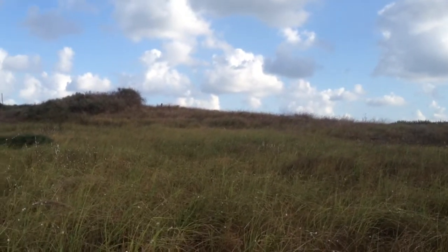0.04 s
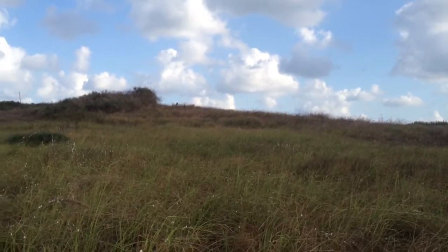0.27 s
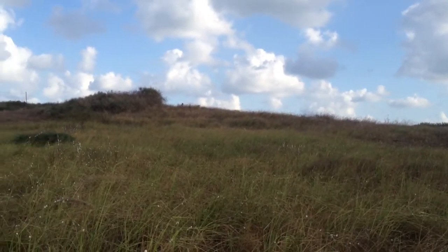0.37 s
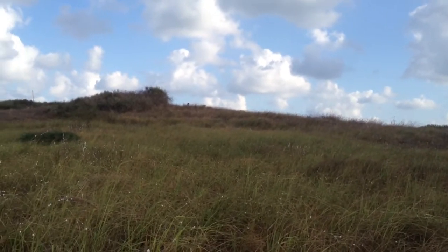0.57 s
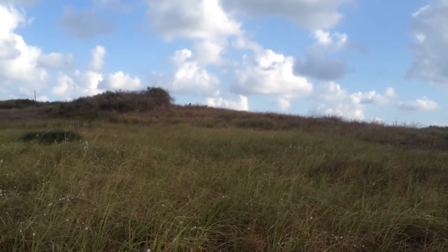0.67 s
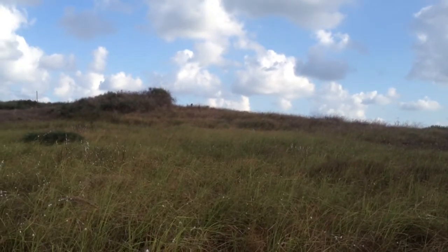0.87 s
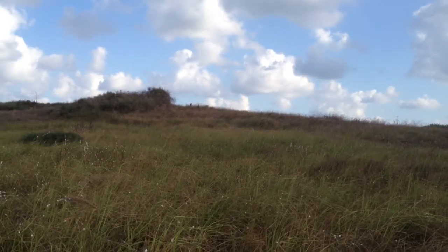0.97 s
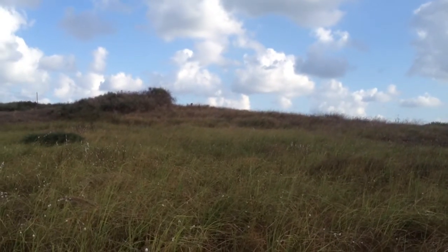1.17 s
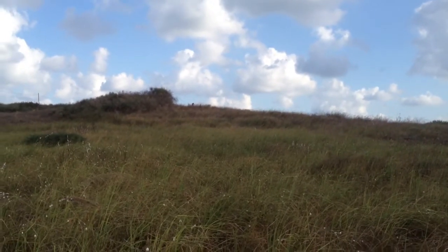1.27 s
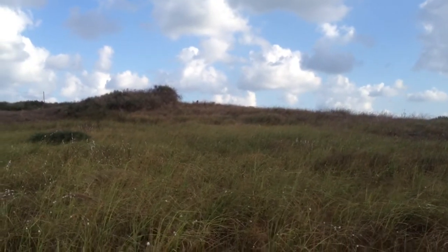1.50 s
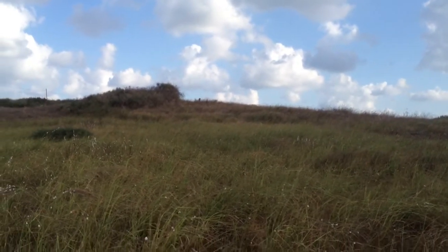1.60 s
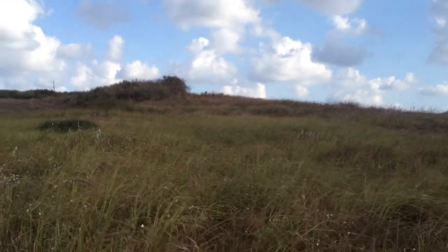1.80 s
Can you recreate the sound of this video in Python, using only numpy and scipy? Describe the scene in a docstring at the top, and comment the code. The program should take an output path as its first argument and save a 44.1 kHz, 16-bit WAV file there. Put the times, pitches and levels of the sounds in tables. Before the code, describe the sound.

A single jackal wail, heard from some distance in an open field, begins raspy, glides downward and thins to a quiet whine. Light wind continues throughout, and a soft, faint bump follows the call.

```python
"""A jackal wails on open grassland

A jackal calls once: a soft hum, a hoarse catch, a full cry that sinks in pitch, then a thin whine.
Its voice is a stack of overtones (multiples of one pitch), and air in its throat adds a rasp.
The land returns a faint echo. Light wind, hiss, a distant drone, grass rustles and a bump lie under it."""
import sys
import numpy as np
from scipy import signal
from scipy.fft import rfft, irfft, next_fast_len
from scipy.io import wavfile
from scipy.ndimage import map_coordinates

SR = 44100
rng = np.random.default_rng(int(sys.argv[2]) if len(sys.argv) > 2 else 0)


def persist_wave(psi):
    """Save psi, clipped to +-1, as 16-bit WAV."""
    counts = np.round(np.clip(psi, -1, 1) * 32767).astype(np.int16)
    wavfile.write(sys.argv[1], SR, np.atleast_2d(counts).T)


N = 81585

# Strength of the wind. Each row: time in seconds, level in dB.
WIND_LEVEL = [(0, -56), (.08, -55.5), (.2, -53.5), (.35, -57), (.7, -56), (1.1, -57.5), (1.3, -58),
              (1.5, -56), (1.85, -57)]
# Tone of the wind. Each row: frequency in Hz, relative level in dB.
WIND_COLOUR = [(15, -70), (25, -31.5), (134, -11), (162, -6), (223, -5.5), (258, -3.5), (287, -9.5),
               (355, -1.5), (379, -9), (716, -5.5), (780, -5), (1030, -13), (1140, -11.5), (1750, -22.5),
               (4000, -41), (5200, -56.5), (8800, -120)]
# Tone of the hiss. Each row: frequency in Hz, relative level in dB.
HISS_COLOUR = [(1500, -13.5), (3500, 3), (6000, 0), (9500, -7.5), (12000, -4), (15000, 2)]
# The distant drone. Each row: frequency in Hz, level in dB.
DRONE_TONES = [(135, -68), (187, -70.5), (252, -75)]
# Pitch of the voice. Each row: time in seconds, pitch in Hz.
VOICE_PITCH = [(.2, 343.4), (.24, 344.3), (.262, 350.2), (.3, 347.9), (.36, 354.4), (.42, 355.2),
               (.48, 351.7), (.54, 345.4), (.6, 335), (.72, 316.5), (.8, 300), (.9, 276), (.96, 258.3),
               (1.07, 237.6), (1.2, 225.3), (1.29, 209.2), (1.38, 187.3), (1.49, 164)]
# Unsteadiness of the voice. Each row: time in seconds, typical shake as a share of the pitch.
PITCH_SHAKE = [(.2, 0.034), (.24, 0.03), (.255, 0.011), (.33, 0.015), (.4, 0.0059), (.8, .003), (1.4, .005)]
# The hum before the mouth opens. Each row: time in seconds, level in dB.
HUM_LEVEL = [(0, -79.5), (.08, -64), (.18, -61), (.25, -78)]
# Grass rustles. Each row: middle in seconds, length in seconds, level in dB.
GRASS_RUSTLES = [(0.05, 0.082, -74.5), (1.455, 0.091, -76.5), (1.75, 0.021, -77)]
# Tone of the grass. Each row: frequency in Hz, relative level in dB.
GRASS_COLOUR = [(800, -34), (2200, 6), (3500, 7), (6000, -15), (10000, -19)]
# Hoarse air in the throat. Each row: time in seconds, level in dB.
RASP_LEVEL = [(.195, -65), (.212, -47.5), (.235, -44), (.25, -35), (.268, -43), (.28, -39), (.295, -45),
              (.36, -46.5), (.5, -52.5), (.65, -60.5), (.85, -70), (1.1, -80)]
# Tone of that air. Each row: frequency in Hz, relative level in dB.
THROAT_COLOUR = [(350, -31), (650, -2), (900, -4), (1300, 0), (1800, 0.5), (2100, -3.5), (2350, -5.5),
                 (2650, -19), (3600, -29.5), (4400, -34.5), (5400, -33.5), (6200, -31.5), (7400, -41.5),
                 (8500, -44.5), (10000, -65.5)]
# A second vibration beside the overtones. Each row: time in seconds, distance above them in Hz.
FLUTTER_GAP = [(.28, 215), (.36, 153.5), (.42, 111.2), (.5, 101.6), (.6, 84)]
# Overtones it sits beside. Each row: multiple of the pitch, flutter level in dB relative to the air.
FLUTTER_OVERTONES = [(3, -9.5), (4, -28), (5, -12.5)]
# The full cry. Each row: time in seconds, level in dB.
CRY_LEVEL = [(.208, -82), (.222, -35.5), (.232, -45), (.256, -33.5), (.34, -33.5), (.48, -34), (.6, -37),
             (.68, -40), (.8, -43.5), (.885, -52), (.93, -60.5)]
# Its first eight overtones. Each row: multiple of the pitch, relative level in dB.
CRY_OVERTONES = [(1, -60), (2, -0.5), (3, -24), (4, -10), (5, -9), (6, -29), (7, -32), (8, -35.5)]
# Where the mouth rings. Each row: frequency in Hz, half width in Hz, boost in dB.
MOUTH_RESONANCES = [(941, 108.5, 13), (1223, 103, 11.5), (2027, 128, 17)]
# The cry's bright edge, above overtone eight. Each row: frequency in Hz, relative level in dB.
EDGE_COLOUR = [(2400, -46), (2900, -31), (3300, -47), (3600, -43), (4300, -65), (5000, -56.5),
               (5300, -40.5), (5650, -51.5), (6050, -38.5), (6500, -47.5), (7400, -46), (7900, -53.5),
               (8600, -53.5), (10000, -79)]
# The thin whine. Each row: time in seconds, level in dB.
WHINE_LEVEL = [(.8, -91), (.9, -62.5), (.96, -59.5), (1.05, -58), (1.2, -63), (1.34, -65), (1.42, -66.5),
               (1.475, -64), (1.5, -87)]
# Its overtones. Each row: multiple of the pitch, relative dB at 1 second, dB lost per second.
WHINE_OVERTONES = [(2, 1.5, 11.5), (3, -30, 2), (4, 3, 50), (5, -22, 0), (6, 3, 1), (7, -24, 12),
                   (8, -14, -21), (10, -23.5, 0)]
# Tone of the bump. Each row: frequency in Hz, relative level in dB.
SOFT_BUMP_COLOUR = [(40, -60), (70, -17), (110, 1), (145, -5), (200, -12), (350, -24), (1000, -80)]


def amp(db):
    """Turn decibels into a gain to multiply by."""
    return 10 ** (np.asarray(db) / 20)


def unit(x):
    """Scale a sound to an average power of 1."""
    return x / np.sqrt(np.mean(x ** 2) + 1e-20)


def times():
    """The time in seconds at each sample."""
    return np.arange(N) / SR


def curve(rows):
    """Join (seconds, value) points with straight lines."""
    return np.interp(times(), *np.transpose(rows))


def envelope(rows):
    """Gain from (seconds, dB) points, fading to silence outside them."""
    outside_s = np.abs(times() - np.clip(times(), rows[0][0], rows[-1][0]))
    return amp(curve(rows)) * np.exp(-outside_s / .01)


def along(points, hz):
    """Read between (Hz, value) points on a log frequency scale."""
    freqs, values = np.transpose(points)
    return np.interp(np.log(hz + 1), np.log(freqs + 1), values)


def wobble(rate):
    """A smooth curve through `rate` random values a second."""
    return map_coordinates(rng.standard_normal(N // 8), [times() * rate], mode="wrap")


def filtered(x, response):
    """Scale each frequency in x by the gain response(hz)."""
    size = next_fast_len(N + SR // 2)
    return irfft(rfft(x, size) * response(np.fft.rfftfreq(size, 1 / SR)), size)[:N]


def noise(colour):
    """Noise of power 1, shaped by (Hz, dB) points."""
    return unit(filtered(rng.standard_normal(N), lambda hz: amp(along(colour, hz))))


def swell(middle_s, length_s):
    """A bell-shaped rise and fall."""
    return np.exp(-(2 * (times() - middle_s) / length_s) ** 2)


def wind():
    """Light wind: a low rush that gently rises and falls."""
    return amp(curve(WIND_LEVEL) + wobble(5.4)) * noise(WIND_COLOUR)


def hiss(level_db=-74):
    """A faint, steady, high hiss."""
    return amp(level_db) * noise(HISS_COLOUR)


def drone(waver_hz=2.98, waver_db=3):
    """Low, distant tones waver in pitch and loudness."""
    sound = np.zeros(N)
    for hz, db in DRONE_TONES:
        phase = 2 * np.pi * np.cumsum(hz + waver_hz * wobble(24)) / SR
        sound += amp(db + waver_db * wobble(12)) * unit(np.sin(phase))
    return sound


def jackal():
    """One shaky pitch drives the opening hum, the rasp, the cry and the whine."""
    pitch = curve(VOICE_PITCH)
    shaky_pitch = pitch * (1 + curve(PITCH_SHAKE) * wobble(420))
    phase = 2 * np.pi * np.cumsum(shaky_pitch) / SR
    start_phases = rng.uniform(0, 2 * np.pi, size=32)

    def overtone(k, shift=0):
        """A pure tone at k times the pitch, its phase moved by `shift` radians."""
        return np.cos(round(k) * phase + start_phases[round(k)] + shift)

    hum = envelope(HUM_LEVEL) * overtone(1)
    return hum + rasp(overtone, phase) + cry(overtone, pitch) + whine(overtone)


def grass():
    """Grass rustles in short swells of bright noise."""
    return noise(GRASS_COLOUR) * sum(amp(db) * swell(s, length) for s, length, db in GRASS_RUSTLES)


def rasp(overtone, phase, catch_s=.222, catch_hz=70, catch_db=3.5):
    """Throat air puffs once a cycle beside a flutter; the voice catches in pulses, then settles."""
    air = unit(noise(THROAT_COLOUR) * (1 + 0.2 * np.cos(phase)))
    flutter_shift = 2 * np.pi * np.cumsum(curve(FLUTTER_GAP) + 14 * wobble(60)) / SR
    flutter = sum(amp(db) * overtone(k, flutter_shift) for k, db in FLUTTER_OVERTONES)
    pulses = np.cos(2 * np.pi * catch_hz * (times() - catch_s))
    catch = amp(catch_db * swell(catch_s, length_s=.079) * pulses)
    return envelope(RASP_LEVEL) * catch * (air + flutter)


def mouth(hz):
    """The mouth boosts tones near the frequencies where it rings."""
    return amp(sum(db / (1 + ((hz - centre) / width) ** 2) for centre, width, db in MOUTH_RESONANCES))


def cry(overtone, pitch, shimmer_db=.18, blur_radians=.9, full_edge_db=-35.5):
    """Strong overtones slide through the mouth's resonances, with a blurred, bright edge above."""
    level = envelope(CRY_LEVEL)
    body = sum(amp(db + shimmer_db * wobble(68)) * mouth(k * pitch) * overtone(k)
               for k, db in CRY_OVERTONES)
    edge = np.zeros(N)
    for k in range(9, 30):
        gain = amp(along(EDGE_COLOUR, k * pitch) + 2 * wobble(30))
        edge += gain * overtone(k, blur_radians * wobble(220))
    # Louder is brighter: the edge gains 1.8 dB for each dB of the cry.
    edge_level = amp(full_edge_db) * (level / amp(full_edge_db)) ** 1.8
    return level * body + edge_level * edge


def echo(call, level_db=-41.5, rise_s=.082, fade_s=1.1, dull_above_hz=2520):
    """The slope and bushes send back a dull, smeared copy of the call."""
    tail = filtered(rng.standard_normal(N), lambda hz: 1 / (1 + (hz / dull_above_hz) ** 2))
    tail *= amp(-60 * times() / fade_s) * (1 - np.exp(-times() / rise_s))
    return amp(level_db) * signal.fftconvolve(call, tail / np.linalg.norm(tail))[:N]


def whine(overtone):
    """The voice thins to a whine whose overtones each fade, hold or grow at their own pace."""
    tones = sum(amp(db - fade * (times() - 1) + 1.5 * wobble(24.896)) * overtone(k)
                for k, db, fade in WHINE_OVERTONES)
    return envelope(WHINE_LEVEL) * tones


def bump(level_db=-53):
    """One soft bump: a short swell of deep noise."""
    return amp(level_db) * swell(middle_s=1.695, length_s=.04) * noise(SOFT_BUMP_COLOUR)


def scene():
    """Mix the call and its echo with the grassland, in one channel."""
    call = jackal()
    return (wind() + hiss() + drone() + call + grass() + echo(call) + bump())[None]


def record(dry, top_hz=15400):
    """Cut away the very highest treble."""
    return np.array([filtered(x, lambda hz: hz < top_hz) for x in dry])


dry = scene()
out = record(dry)
persist_wave(out)
```